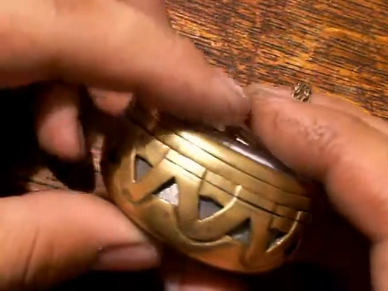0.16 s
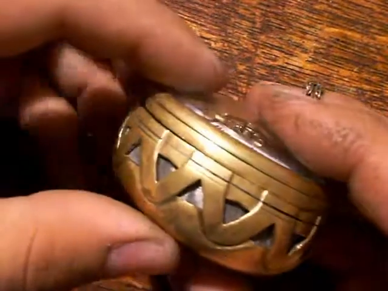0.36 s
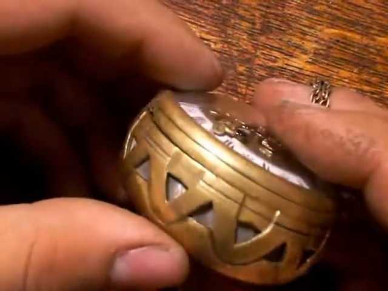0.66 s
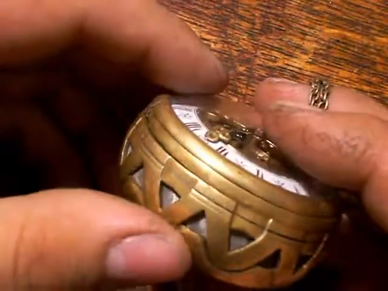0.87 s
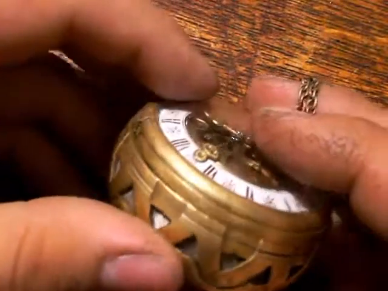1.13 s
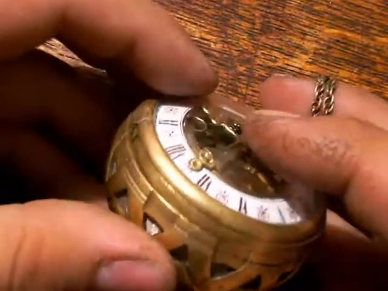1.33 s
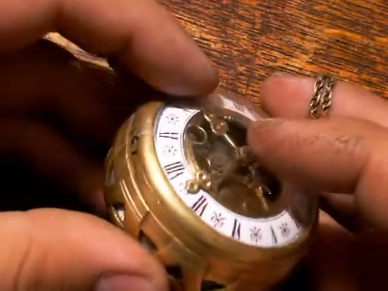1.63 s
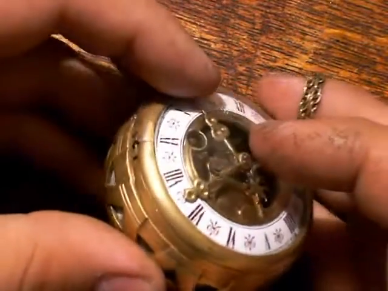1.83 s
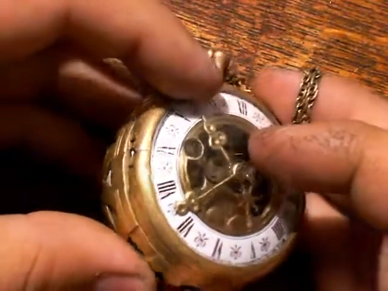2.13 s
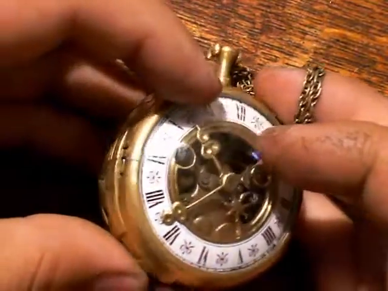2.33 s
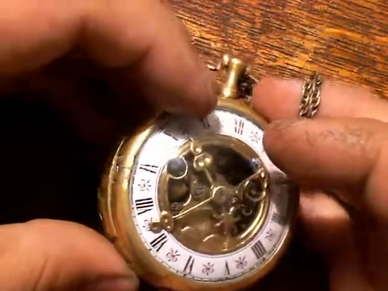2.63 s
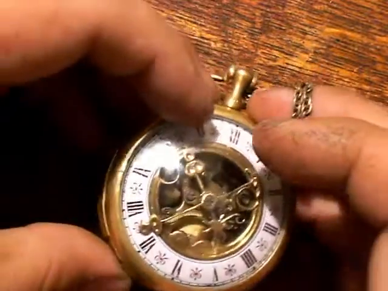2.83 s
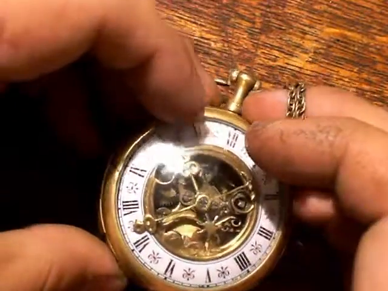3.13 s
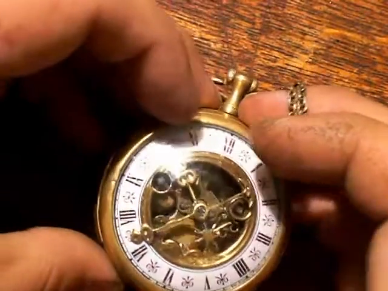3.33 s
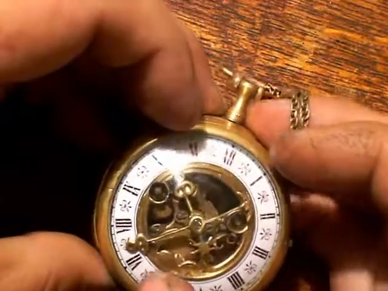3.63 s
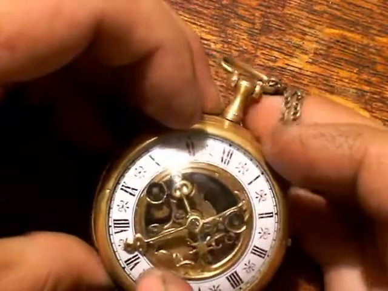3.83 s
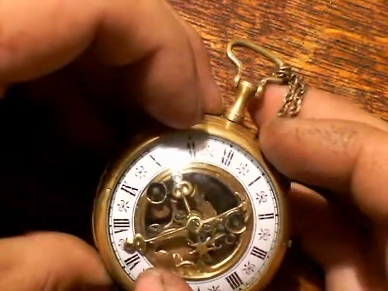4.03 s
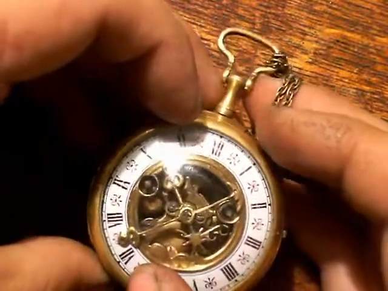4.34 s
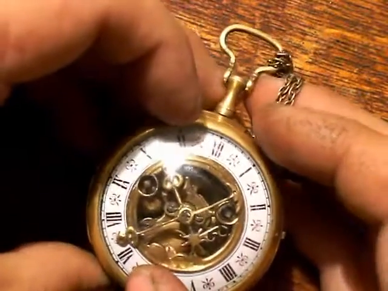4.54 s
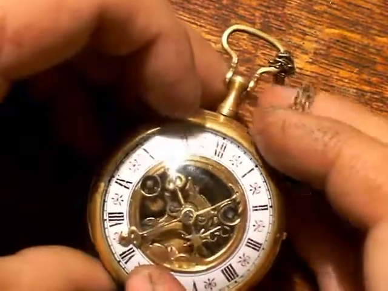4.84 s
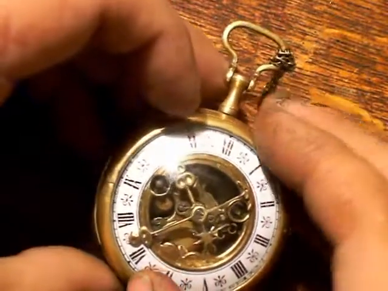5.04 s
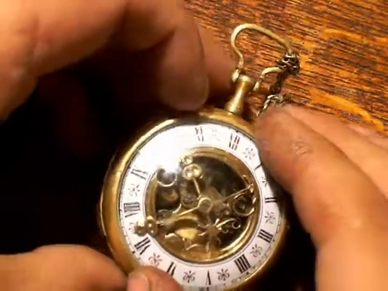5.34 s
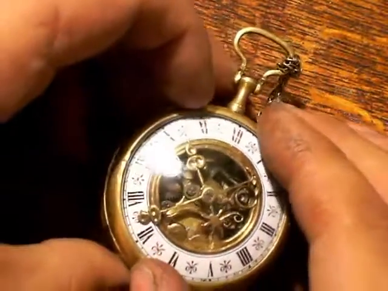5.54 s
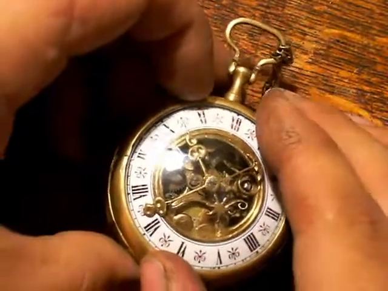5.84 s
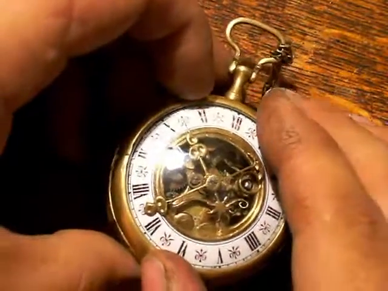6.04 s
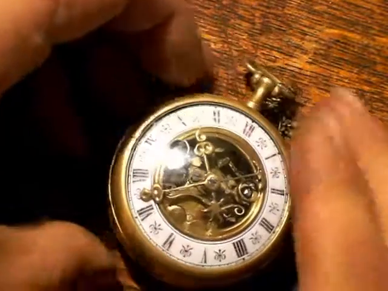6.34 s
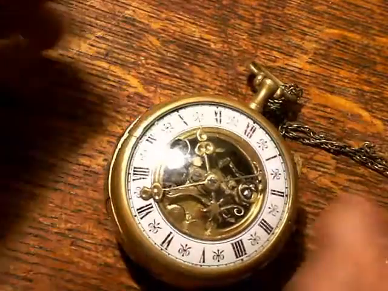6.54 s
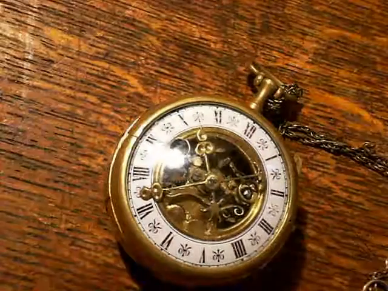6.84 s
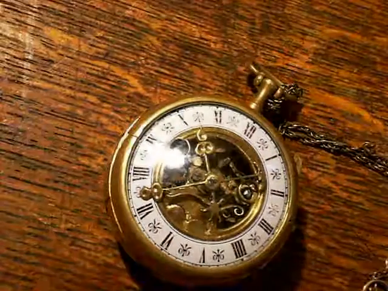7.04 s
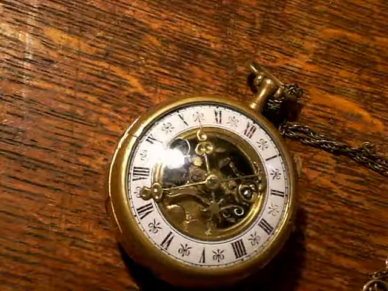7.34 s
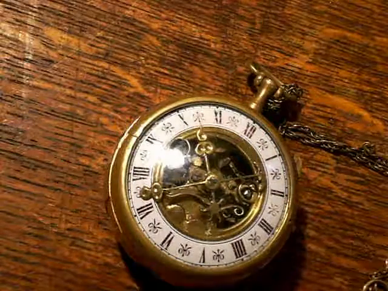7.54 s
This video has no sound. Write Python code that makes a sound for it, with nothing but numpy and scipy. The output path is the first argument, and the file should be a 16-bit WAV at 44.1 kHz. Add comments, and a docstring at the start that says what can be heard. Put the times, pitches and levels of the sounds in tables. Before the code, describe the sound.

Steady low-level microphone hiss, with little extreme treble, fills a quiet room. A small mechanical watch ticks faintly and thinly, roughly every 0.4 seconds and slightly unevenly, almost buried. From 0 to 2.9 seconds handling adds sparse little metallic clicks, clearer near 1.0 and 1.7. At 2.95 the brass case strikes the wooden table: a hard, very tight double knock, much louder than everything else, with a brief woody after-ring. Between 3.3 and 3.9 come soft dull bumps, tiny metal creaks and low skin rubbing, ending in a small scuff and thud. Light clicks follow at 4.3 and around 5.0, with faint taps to 5.8. At 6.18 a sharp bright click opens a short rattle of chain links and soft bumps, with more small clinks near 6.5. Afterwards only ticks, hiss, low rustling and gentle scuffs, the clearest at 7.15, continue to about 7.7.

```python
"""Faint uneven escapement ticks over steady microphone hiss, then clicks, a hard knock and soft rubbing:
a brass pocket watch is turned over by hand, set down on a wooden table and let go in a quiet room.
Ticks, clicks and knocks are struck banks of damped modes; bow and chain are small impulses into resonators.
Scuffs, a dull thud, rubbing, shuffle, table sway and hiss are shaped noise; noise tails add the after-ring."""
import sys
import numpy as np
from scipy import signal
from scipy.fft import rfft, irfft
from scipy.io import wavfile

SR = 44100
rng = np.random.default_rng(int(sys.argv[2]) if len(sys.argv) > 2 else 0)


def store_wav(level_fs):
    """Save 16-bit WAV to argv[1]."""
    pcm = np.round(np.clip(np.atleast_2d(level_fs), -1, 1) * 32767)
    wavfile.write(sys.argv[1], SR, pcm.T.astype(np.int16))


N = 339129
CUTOFF_HZ = 7010


def from_db(db):
    """Decibels to gain."""
    return 10 ** (np.asarray(db) / 20)


def rms_one(x):
    """Scale to rms 1."""
    return x / np.sqrt(np.mean(x ** 2) + 1e-20)


def in_time(rows):
    """Interpolate curve columns at every sample; -120 outside their span."""
    t_s, *columns = np.transpose(rows)
    return [np.interp(np.arange(N) / SR, t_s, c, left=-120, right=-120) for c in columns]


def coloured(spectrum):
    """White noise shaped to a spectrum of (f/Hz, level/dB); rms 1."""
    f_hz, level_db = np.transpose(spectrum)
    bins_hz = np.fft.rfftfreq(N, 1 / SR) + 1   # offset avoids log 0
    shape_db = np.interp(np.log(bins_hz), np.log(f_hz), level_db)
    return rms_one(irfft(rfft(rng.standard_normal(N)) * from_db(shape_db), N))


def drift(rate_hz):
    """Slow random fluctuation, rms 1: noise through two equal poles."""
    knots_per_s = 100
    knots = rng.standard_normal(int(N / SR * knots_per_s) + 200)
    r = np.exp(-2 * np.pi * rate_hz / knots_per_s)
    slow = signal.lfilter([1], [1, -2 * r, r * r], knots)[190:]   # drop the filter's start-up
    return np.interp(np.arange(N) / SR * knots_per_s, np.arange(len(slow)), rms_one(slow))


def ring(impulses, f_hz, t60_s):
    """Two-pole resonator: a unit impulse starts a damped sine of height 1."""
    r, w = from_db(-60 / (t60_s * SR)), 2 * np.pi * f_hz / SR
    return signal.lfilter([0, np.sin(w)], [1, -2 * r * np.cos(w), r * r], impulses + 1e-18)


def train(times_s, gains):
    """Impulses of given gains at given times."""
    out = np.zeros(N)
    np.add.at(out, np.minimum((np.asarray(times_s) * SR).astype(int), N - 1), gains)
    return out


def strike(out, start_s, f_hz, gains, t60_s, rise_s):
    """Add damped sines set off by one contact that lasts about rise_s."""
    t = np.arange(round(SR * np.max(t60_s)))[:, None] / SR
    modes = np.sin(2 * np.pi * f_hz * t) * from_db(-60 * t / t60_s)
    sound = modes @ gains * (1 - np.exp(-t[:, 0] / rise_s))
    return out + np.pad(sound, (round(start_s * SR), N))[:N]


# escapement beats, uneven while the watch is tilted: t/s, relative level/dB
BEATS = [(0.1434, -41.5), (0.5548, -43), (0.893, -42.5), (1.3076, -47.5), (1.6861, -42), (2.09, -43.5),
         (2.4746, -42.5), (2.8651, -43.5), (3.2001, -49.5), (3.5444, -43.5), (3.933, -44), (4.7896, -45.5),
         (5.196, -42.5), (5.6405, -44), (6.0304, -43.5), (6.4664, -46), (6.8174, -46), (7.2105, -41),
         (7.5767, -44.5)]
# plates of the movement: f/Hz, relative level/dB, relative t60/s
PLATE_MODES = [(2540, -17.5, 0.044), (2870, -12.5, 0.014), (3600, -21.5, .01), (4120, -14, 0.0088),
               (4670, -15.5, .012), (5300, -7, 0.013), (5700, -7, 0.016), (5950, -4, 0.019),
               (6300, 2, 0.019), (6500, -3.5, 0.011), (6990, -8, 0.023)]
TICK_TILT_DB_PER_OCT, TICK_TILT_SPREAD_DB_PER_OCT = 0.5, 1   # brightness, spread from beat to beat


def escapement():
    """Each beat is unlocking, impulse and drop within a few ms, rung through the plates."""
    out = np.zeros(N)
    steps = [(0, -10), (.0007, 0), (.0021, -17.5)]   # delay/s, level/dB
    f_hz, level_db, t60_s = np.transpose(PLATE_MODES)
    chance = rng.normal(0, 1, (len(BEATS), 3, len(f_hz)))
    for (start_s, beat_db), (pitch, strength, tilt) in zip(BEATS, chance):
        tilt_db = TICK_TILT_DB_PER_OCT + TICK_TILT_SPREAD_DB_PER_OCT * tilt[0]
        gains = from_db(.7 * level_db + tilt_db * np.log2(f_hz / 6000) + 2.5 * strength)
        gains = gains * from_db(beat_db + 4.0) / np.linalg.norm(gains)
        held_hz = f_hz * (1 + .03 * pitch)   # the grip detunes the plates a little
        for delay_s, step_db in steps:
            out = strike(out, start_s + delay_s, held_hz, gains * from_db(step_db), 0.87 * t60_s, .0004)
    return out


# chain links and bow on the case: t/s, relative level/dB, f_centre/Hz, low case mode level/dB, t60/s
LINK_CLICKS = [(0.215, -52, 2970, -2, .03), (0.7532, -43, 6500, -25, 0.022),
               (1.04, -31.5, 5600, -12.5, .02), (1.5462, -55, 5000, -13, .03),
               (1.734, -33.5, 3200, -22, .016), (1.9086, -48.5, 6070, -8, .03), (1.93, -48, 5500, -15, .02),
               (2.269, -39.5, 5760, -5.5, .035), (2.5306, -47.5, 5990, -18, .07),
               (2.8539, -42.5, 5950, -14, .045), (3.448, -45, 6700, -25, .025),
               (3.6444, -38.5, 4000, -8, .024), (3.7504, -51, 6670, -14, .05),
               (4.0486, -51, 4500, -20, .03), (4.093, -45, 4640, -13, .03),
               (4.344, -38.5, 4500, -25, 0.038), (4.8196, -48, 3000, -9, .02),
               (4.9765, -35.5, 5660, -30, 0.024), (5.0408, -41, 5000, -16, .04),
               (5.0722, -34, 5200, -30, 0.025), (5.487, -52, 3180, -9, .03), (5.8592, -53, 5500, -16, .02),
               (5.9807, -47.5, 3070, -4, .034), (6.1702, -35, 6200, -30, .018),
               (6.1765, -23, 6000, -24, .032), (6.2016, -29.5, 5200, -30, 0.038),
               (6.222, -35, 4700, -30, .045), (6.2467, -37, 5300, -29, 0.043),
               (6.2638, -38, 5350, -25, .03), (6.353, -41, 4500, -11, .04), (6.5083, -36, 6200, -15, .03),
               (6.5244, -38.5, 6200, -14, .04), (6.5392, -37, 6200, -16, .024)]
# brass case: f/Hz, relative level/dB, t60/s
CASE_MODES = [(730, -5.5, 0.02), (1094, 4, .018), (1440, -5, 0.017), (1734, -0.5, 0.026), (4560, -12, 0.12)]
LINK_BREADTH_OCT = 0.78


def clicks(count=36):
    """Every link has many short modes of its own, bunched round a centre; the case rings along."""
    out = np.zeros(N)
    chance = rng.random((len(LINK_CLICKS), 3, count))
    case_hz, case_db, case_t60_s = np.transpose(CASE_MODES)
    for (start_s, click_db, centre_hz, low_db, t60_s), (place, size, sign) in zip(LINK_CLICKS, chance):
        f_hz = 1600 * 4.5 ** ((np.arange(count) + place) / count)
        shape_db = np.maximum(-12 * (np.log2(f_hz / centre_hz) / LINK_BREADTH_OCT) ** 2, -15)
        gains = from_db(shape_db + 5.0 * size) * np.sign(sign - .5)
        gains = gains * from_db(click_db - 3.0) / np.linalg.norm(gains)
        out = strike(out, start_s, f_hz, gains, np.full(count, t60_s), .0004)
        body_db = np.where(case_hz < 2100, low_db, -18)   # duller touches sound more of the low modes
        case_gains = from_db(click_db + case_db + body_db)
        out = strike(out, start_s, case_hz, case_gains, case_t60_s, 0.0019)
    return out


# the chain slides off the fingers in spurts: t_start/s, t_end/s, relative level/dB, f_centre/Hz
CHAIN_SPURTS = [(4.97, 5.072, -53, 5830), (6.196, 6.213, -34, 5500), (6.25, 6.29, -41.5, 5700),
                (6.328, 6.38, -52, 5000), (6.455, 6.5, -49, 6300), (6.51, 6.54, -42, 6300),
                (6.56, 6.59, -53, 5500)]
CHAIN_SWELL_DB_PER_S, CHAIN_FALL_DB_PER_S = 1000, 649
CONTACTS_PER_S, CHAIN_T60_S = 2400, 0.014


def chain(count=26):
    """Showers of tiny link contacts ring briefly at many pitches; each spurt swells, holds and falls away."""
    t = np.arange(N) / SR
    spurts = []
    for start_s, end_s, level_db, _ in CHAIN_SPURTS:
        before_db = CHAIN_SWELL_DB_PER_S * (start_s - t)
        after_db = CHAIN_FALL_DB_PER_S * (t - end_s)
        spurts.append(level_db - np.maximum(np.maximum(before_db, after_db), 0))
    spurts = np.array(spurts)
    jingle_db = spurts.max(axis=0)
    centre_hz = np.array(CHAIN_SPURTS)[spurts.argmax(axis=0), -1]

    contacts = rng.random(N) < CONTACTS_PER_S / SR
    size_db = 2.8 * np.minimum(rng.exponential(1, N), 4)
    impulses = contacts * from_db(size_db) * rng.choice([-1, 1], N)
    dealt = rng.integers(0, count, N)   # the resonator each contact excites
    out = np.zeros(N)
    for k, f_hz in enumerate(np.geomspace(2200, 7100, count)):
        shape_db = np.maximum(-50 * np.log2(f_hz / centre_hz) ** 2, -13)
        out += ring(impulses * (dealt == k) * from_db(jingle_db + shape_db - 9), f_hz, CHAIN_T60_S)

    f_hz, level_db, t60_s = CASE_MODES[-1]   # highest case mode rings along
    case_db = jingle_db + level_db - 15 - 70 * np.log2(f_hz / centre_hz) ** 2
    return out + ring(impulses * from_db(case_db), f_hz, t60_s)


# the bow creaks in its socket: t/s, relative level/dB
BOW_SLIPS = [(3.3248, -56), (3.3483, -62), (3.3664, -58), (3.393, -59), (3.4485, -52.5), (3.5253, -56),
             (3.5788, -56), (3.8495, -47), (3.8616, -58)]
BOW_HZ, BOW_T60_S = 1720, .075


def bow():
    """Small slips of the bow sound one pair of close modes."""
    t_s, level_db = np.transpose(BOW_SLIPS)
    slips = train(t_s, from_db(level_db - 2))
    return ring(slips, BOW_HZ, BOW_T60_S) + ring(slips, BOW_HZ * .96, BOW_T60_S)


# dense after-ring of table and room: f/Hz, relative level/dB, t60/s
AFTER_RING_BANDS = [(250, -27, 0.52), (420, -24.5, 0.5), (640, -22.5, 0.49), (1080, -19, 0.47),
                    (1490, -18.5, 0.32), (2370, -16, 0.13), (3750, -25.5, 0.13), (5500, -31, 0.23)]


def after_ring(x):
    """Many small modes and near echoes: noise that dies at its own rate in each band."""
    t = np.arange(SR // 2) / SR
    tail = np.zeros(len(t))
    for f_hz, level_db, t60_s in AFTER_RING_BANDS:
        band_filter = signal.butter(2, [f_hz / 1.27, f_hz * 1.27], "band", fs=SR, output="sos")
        band = signal.sosfilt(band_filter, rng.standard_normal(len(t)))
        tail += rms_one(band) * from_db(level_db - 60 * t / t60_s)
    return signal.fftconvolve(x, tail * np.minimum(t / 0.0017, 1))[:N]


# case and knuckles on the table top: t/s, relative level/dB, f_contact/Hz (cut-off, higher is harder)
TABLE_KNOCKS = [(2.9499, -13, 2000), (2.9526, -10.5, 2270), (3.366, -39.5, 250), (3.397, -34.5, 250),
                (3.524, -39.5, 250), (3.572, -38, 250), (3.644, -30, 300), (3.733, -36, 250),
                (3.752, -31.5, 300), (3.834, -37, 250), (5.174, -37.5, 250), (5.687, -40, 500),
                (5.722, -43, 300), (5.776, -41, 250), (5.84, -42.5, 200), (6.292, -33, 250),
                (6.335, -32.5, 250), (6.353, -31.5, 300), (6.386, -36, 250)]
# table top: f/Hz, relative level/dB, t60/s undamped
TABLE_MODES = [(118.3, -14.5, 0.1), (215, -20, 0.05), (257.4, -9.5, 0.094), (341.2, -11, 0.19),
               (440, -3.5, 0.037), (640, -16.5, .2), (878, -15.5, 0.31), (1060, -4.5, 0.038),
               (1212, -4, 0.077), (1262, 3.5, 0.06), (1485, -5, 0.035), (1630, -5.5, 0.096),
               (2490, -8, 0.037), (2890, -8, .015), (3430, -2, 0.012), (4100, -19, .015),
               (5170, -9.5, 0.021), (6740, 2.5, 0.013)]
# share of the free ring time: harder blows shake off the hand's damping
FREE_AT_LIGHT, FREE_PER_DB, LIGHT_DB = 0.19, .025, -39.5


def table():
    """A soft contact is a low-passed push; board and after-ring sound less under a resting hand."""
    out, push = np.zeros(N), np.zeros(N)
    strengths_db = rng.normal(0, 1.67, (len(TABLE_KNOCKS), len(TABLE_MODES)))
    f_hz, level_db, t60_s = np.transpose(TABLE_MODES)
    for (start_s, knock_db, contact_hz), strength_db in zip(TABLE_KNOCKS, strengths_db):
        free = np.clip(FREE_AT_LIGHT + FREE_PER_DB * (knock_db - LIGHT_DB), .05, 1)
        reached = from_db(level_db) / (1 + (f_hz / contact_hz) ** 2)
        force = from_db(knock_db) / np.linalg.norm(reached)
        polarity = np.sign(f_hz - 550)   # low modes swing against the high ones
        gains = force * reached * from_db(strength_db) * polarity
        out = strike(out, start_s, f_hz, gains, t60_s * free, 0.46 / contact_hz)
        r, n = np.exp(-2 * np.pi * contact_hz / SR), np.arange(800)
        pulse = (1 - r) ** 2 * (n + 1) * r ** n   # two equal low-pass poles
        push[round(start_s * SR) + n] += free ** 2.8 * force * pulse
    no_deep_bass = signal.butter(4, 170, "high", fs=SR, output="sos")   # the board radiates none
    return signal.sosfilt(no_deep_bass, out + after_ring(push))


# short scuffs of skin or cloth, and one dull low thud at 3.842 s:
# t/s, t60/s, relative level/dB, tilt/(dB/oct)
SCUFF_EVENTS = [(2.53, 0.33, -57.5, 6), (3.841, .06, -40.5, 1.5), (3.842, .2, -47.5, -8.5),
                (4.95, 0.42, -58, 7), (5.675, 0.55, -53, -5.5), (6.825, 0.3, -54, -1.5),
                (7.144, 0.42, -45, -2), (7.655, 0.33, -53, -5)]
SCUFF_RISE_S, SCUFF_TOP_HZ, TILT_DB_PER_TOP_OCT = .013, 6000, 3   # duller rows also end lower


def scuffs():
    """Scuffs and one dull thud: lumpy noise that swells quickly and dies away."""
    out, t = np.zeros(N), np.arange(N) / SR
    for start_s, t60_s, level_db, tilt_db in SCUFF_EVENTS:
        top_hz = min(SCUFF_TOP_HZ * 2 ** (tilt_db / TILT_DB_PER_TOP_OCT), CUTOFF_HZ)
        slope = [(f_hz, tilt_db * np.log2(f_hz / 1000)) for f_hz in (200, top_hz)]
        noise = coloured([(60, -29)] + slope + [(1.4 * top_hz, slope[1][1] - 12.0)])
        age_s = np.maximum(t - start_s, 0)
        decay_db = level_db - 60 * np.maximum(age_s - SCUFF_RISE_S, 0) / t60_s
        out += noise * np.minimum(age_s / SCUFF_RISE_S, 1) * from_db(decay_db)
    return out * from_db(1.3 * drift(40))


# how busy the hands are: t/s, relative level/dB
HAND_ACTIVITY = [(0, -63.5), (.9, -61.5), (1.9, -63), (2.9, -60.5), (3.2, -61.5), (3.4, -57), (3.9, -60),
                 (4.1, -61.5), (5.1, -61.5), (5.4, -57), (5.7, -58), (6.1, -59.5), (6.45, -54),
                 (6.75, -57.5), (7.05, -60), (7.69, -59)]
# skin on wood: f/Hz, relative level/dB
SHUFFLE_SPECTRUM = [(40, -17), (120, -6), (250, -3), (450, -7.5), (900, -8.5), (2000, -13), (7000, -21.5)]
# skin on brass: f/Hz, relative level/dB
RUB_SPECTRUM = [(40, -35.5), (300, -3), (900, -1.5), (2000, -10.5), (4000, -8), (7000, -3.5)]
# table sway: f/Hz, relative level/dB
RUMBLE_SPECTRUM = [(15, -5), (35, 0), (70, -2), (120, -14), (300, -48)]
# the table sways when weight shifts: t_peak/s, level/dB
TABLE_SWAYS = [(3.45, -74), (3.87, -73), (6.65, -72), (7.3, -68.5)]
SWAY_REST_DB, SWAY_DB_PER_S = -87, 50
RUB_DB, RUB_DB_PER_ACTIVITY_DB, CALM_DB = -68, 2.2, -60   # rub level where activity is at CALM_DB


def hands():
    """Skin shuffles low and lumpy on the wood, rubs brighter on the brass, and the table sways."""
    t = np.arange(N) / SR
    activity_db, = in_time(HAND_ACTIVITY)
    shuffle = coloured(SHUFFLE_SPECTRUM) * from_db(activity_db - 1.5 + 1.1 * drift(40))
    rub_db = RUB_DB + RUB_DB_PER_ACTIVITY_DB * (activity_db - CALM_DB)
    rub = coloured(RUB_SPECTRUM) * from_db(rub_db + 1.9 * drift(30))
    sways_db = [np.maximum(peak_db - SWAY_DB_PER_S * abs(t - peak_s), SWAY_REST_DB)
                for peak_s, peak_db in TABLE_SWAYS]
    sway = coloured(RUMBLE_SPECTRUM) * from_db(np.max(sways_db, axis=0))
    return shuffle + rub + sway


# microphone hiss: f/Hz, relative level/dB
HISS_SPECTRUM = [(12, -47.5), (20, -11.5), (126, 1), (370, -0.5), (618, -6), (699, -6.5), (1770, -11),
                 (2210, -11.5), (6190, -11.5), (7000, -12.5), (9100, -47), (15400, -120)]
HISS_DB = -62.5


def hiss():
    """Steady microphone noise with a fixed spectrum."""
    return from_db(HISS_DB) * coloured(HISS_SPECTRUM)


def scene():
    """Watch, table and hands close to one microphone."""
    metal = escapement() + clicks() + chain() + bow()
    near = metal + from_db(-28) * after_ring(metal) + table() + scuffs() + hands()
    return (near + hiss())[None]


def record(dry):
    """A steep elliptic low-pass cuts the top."""
    return signal.sosfilt(signal.ellip(12, .3, 70, CUTOFF_HZ, fs=SR, output="sos"), dry)


dry = scene()
out = record(dry)
store_wav(out)
```